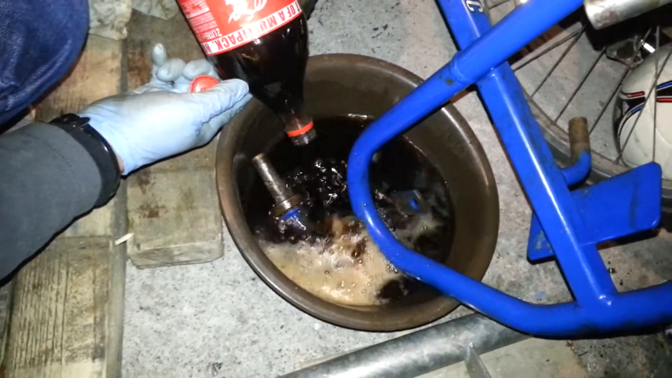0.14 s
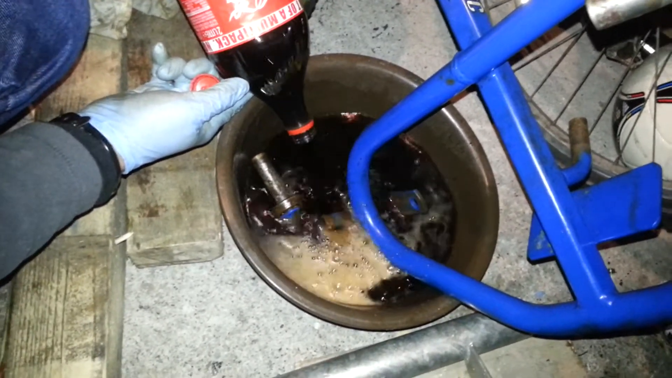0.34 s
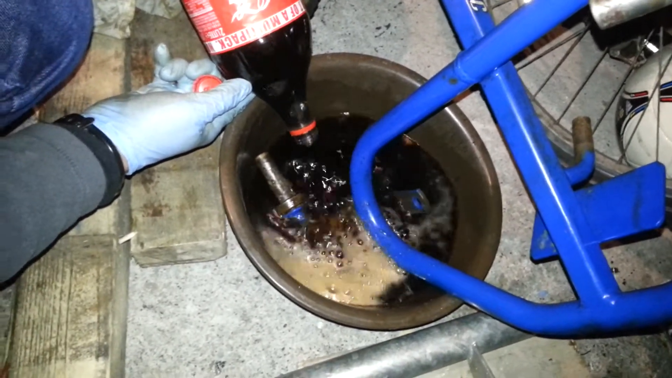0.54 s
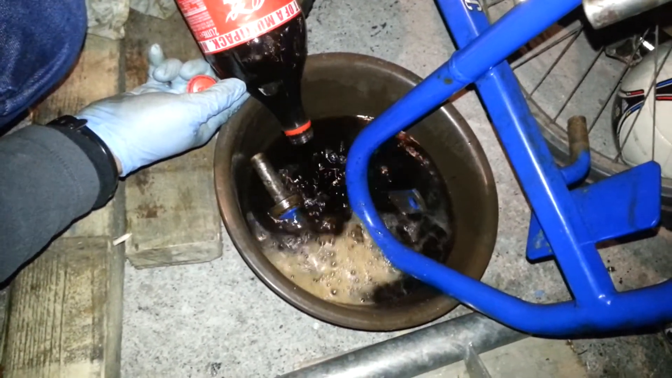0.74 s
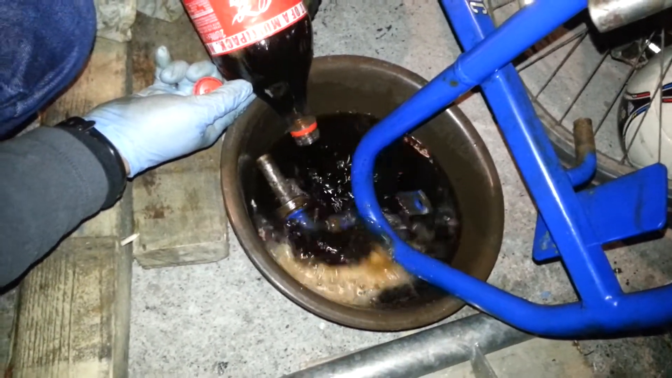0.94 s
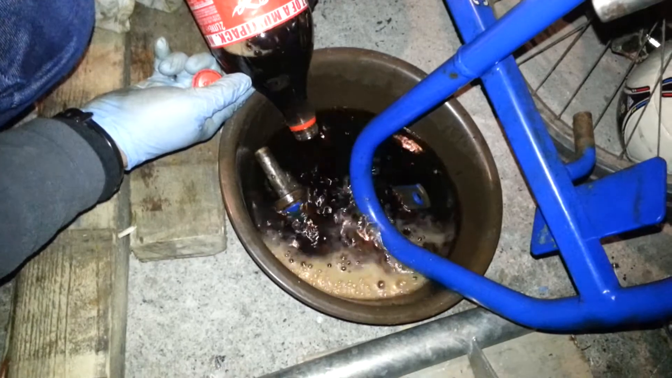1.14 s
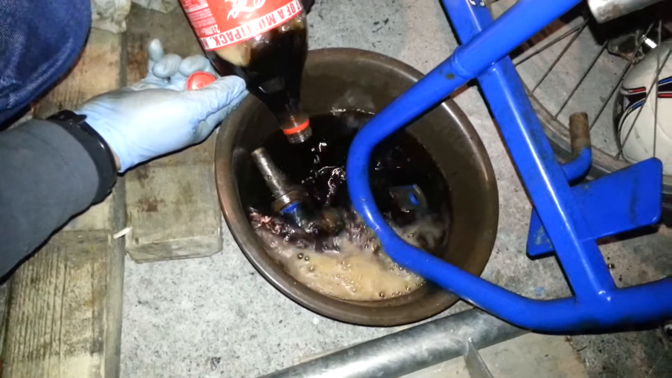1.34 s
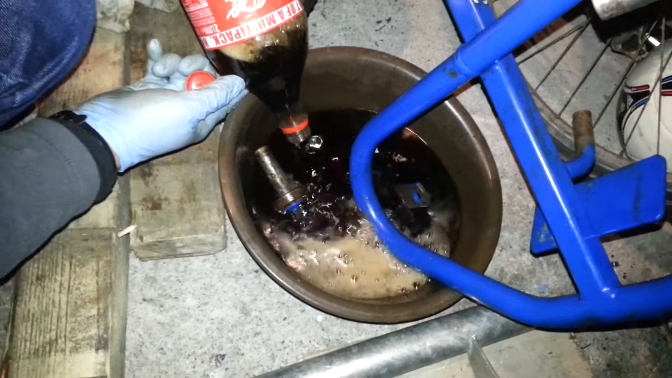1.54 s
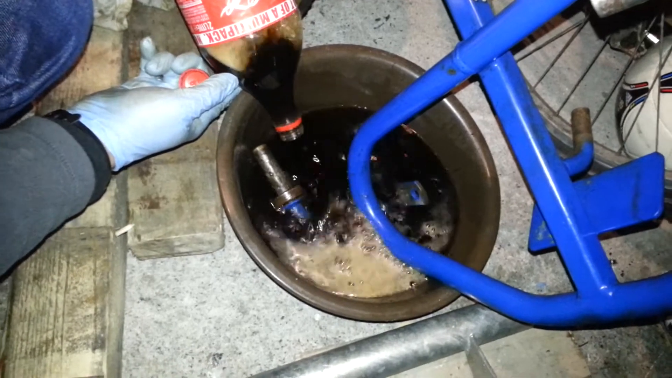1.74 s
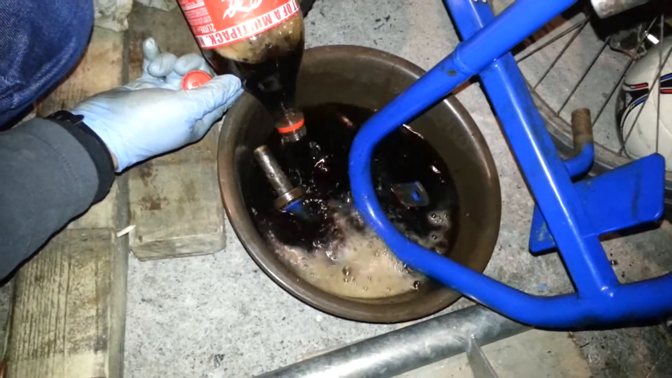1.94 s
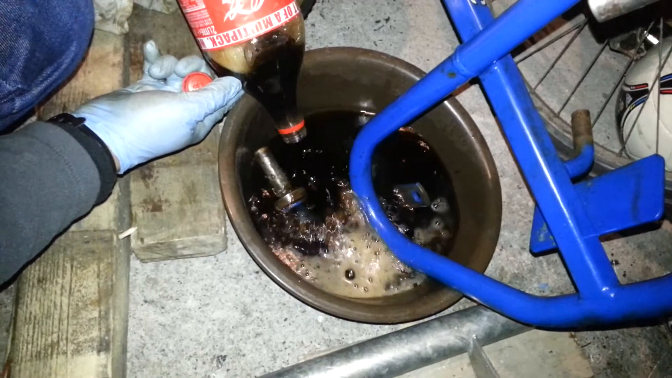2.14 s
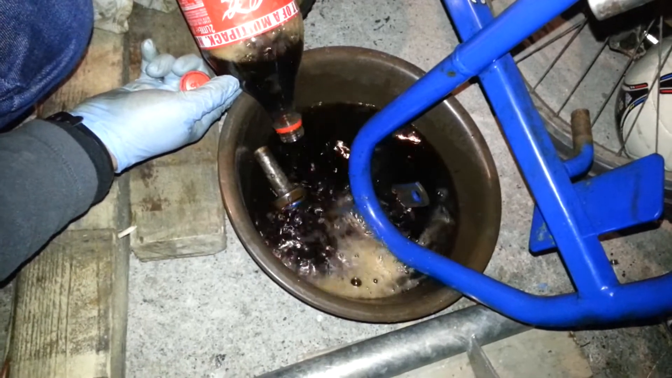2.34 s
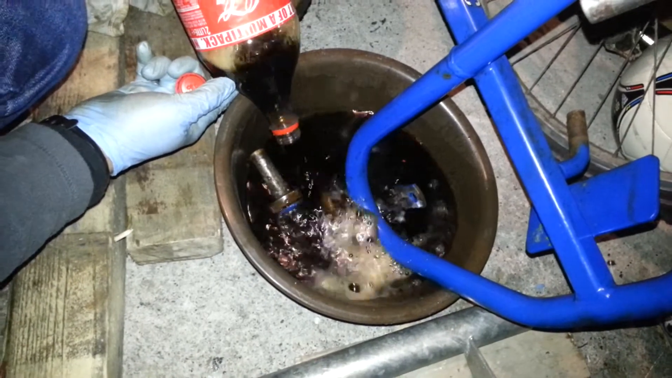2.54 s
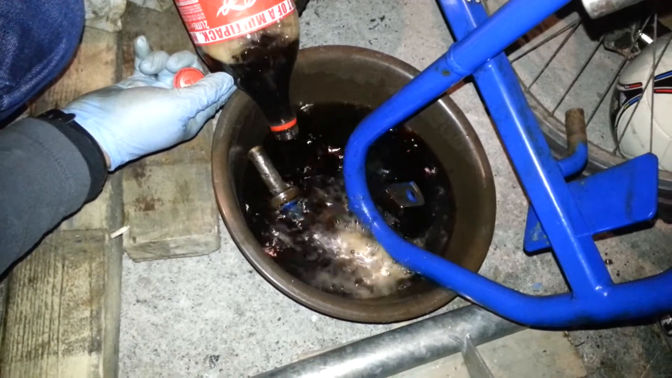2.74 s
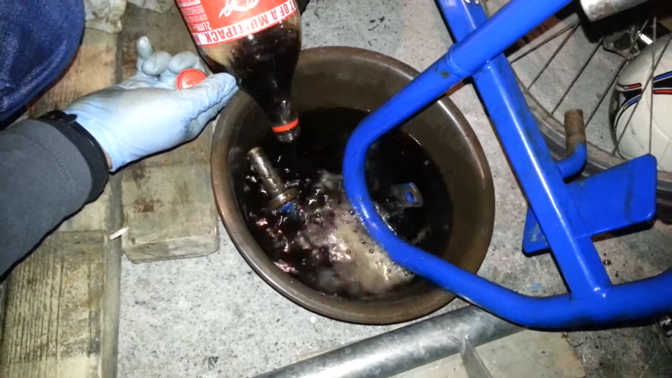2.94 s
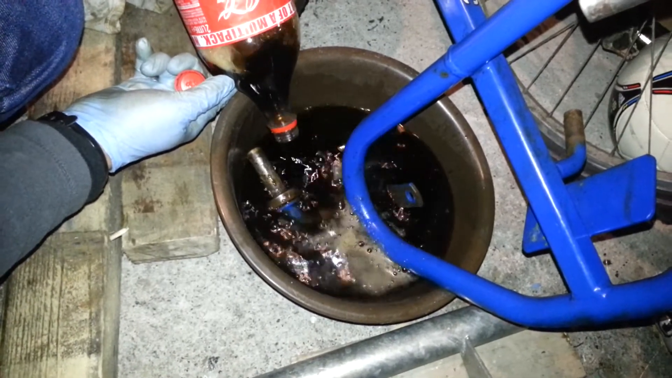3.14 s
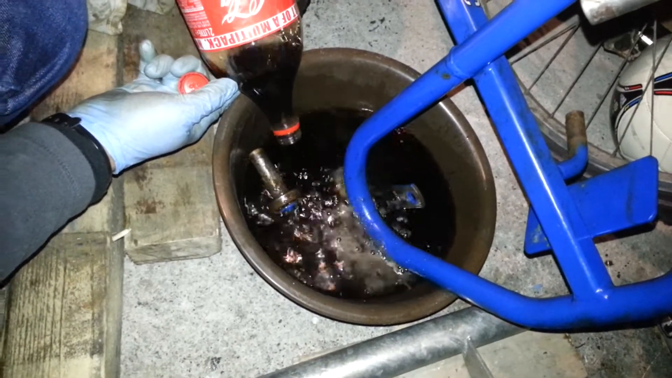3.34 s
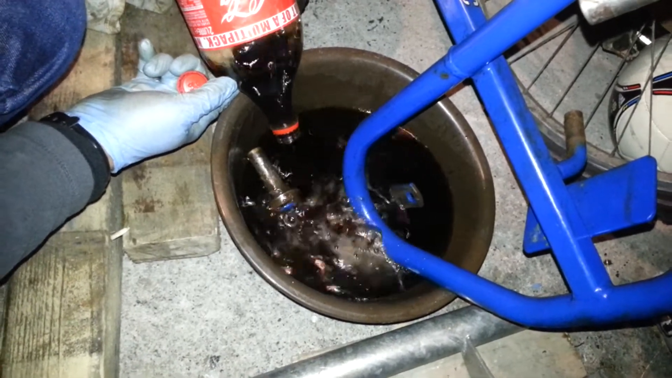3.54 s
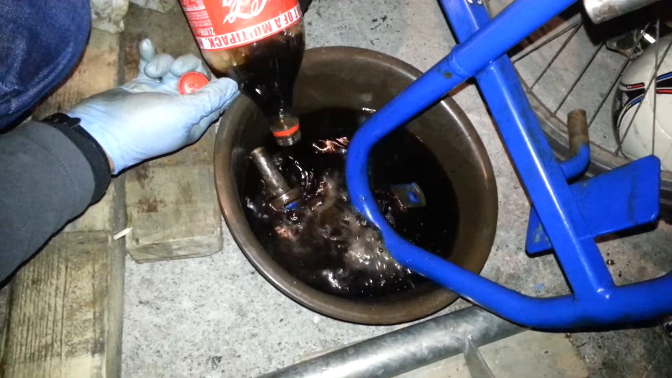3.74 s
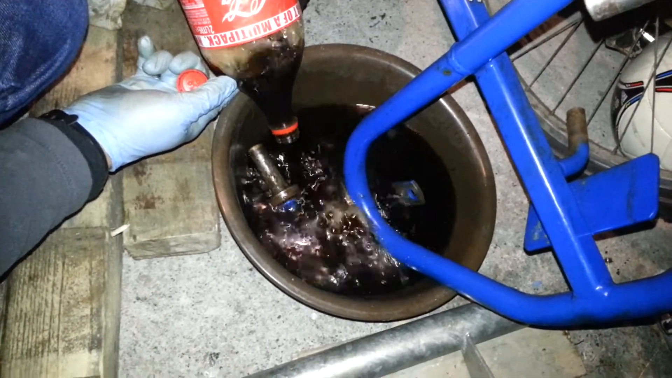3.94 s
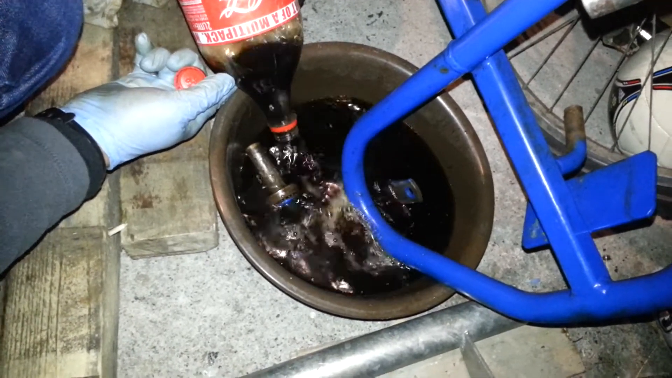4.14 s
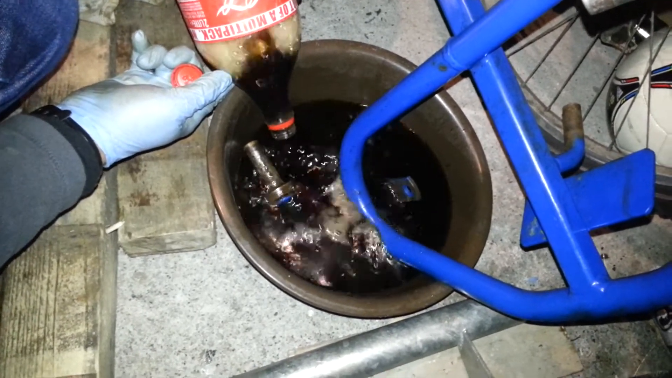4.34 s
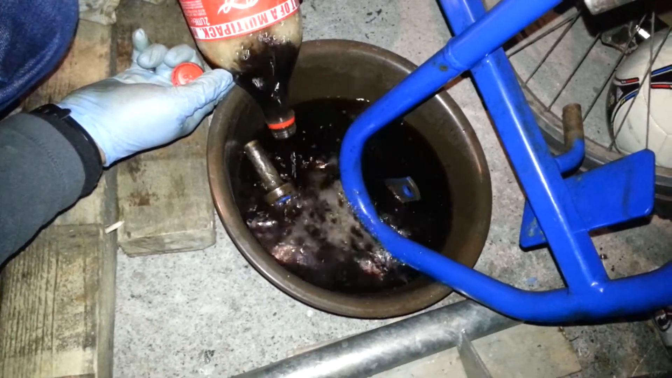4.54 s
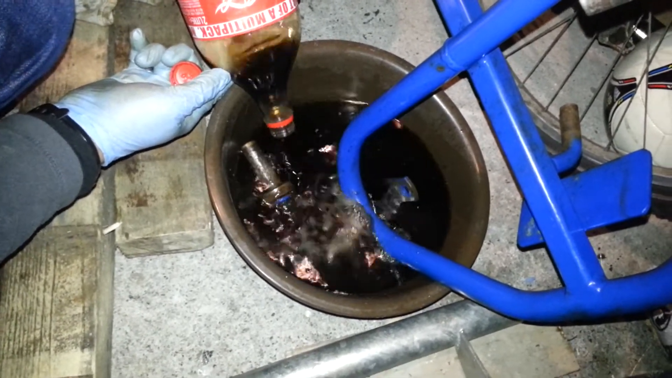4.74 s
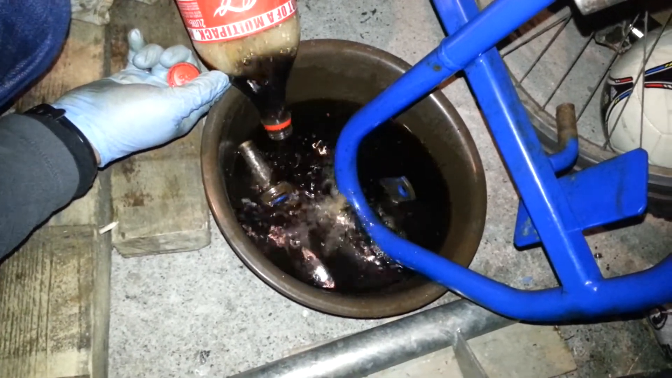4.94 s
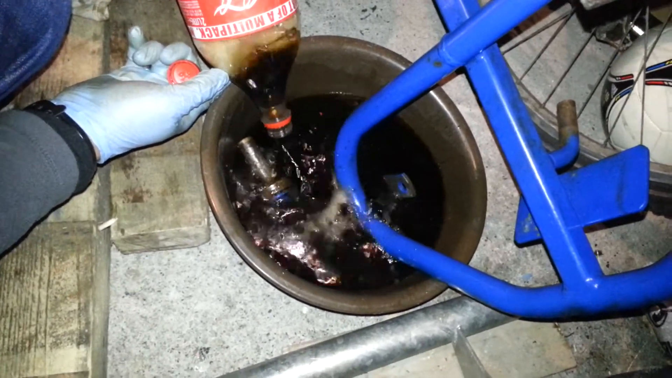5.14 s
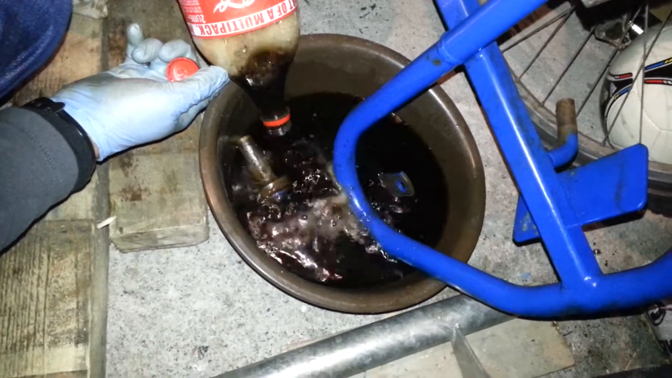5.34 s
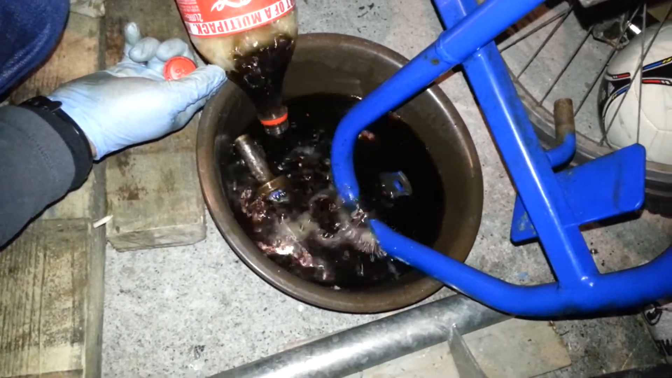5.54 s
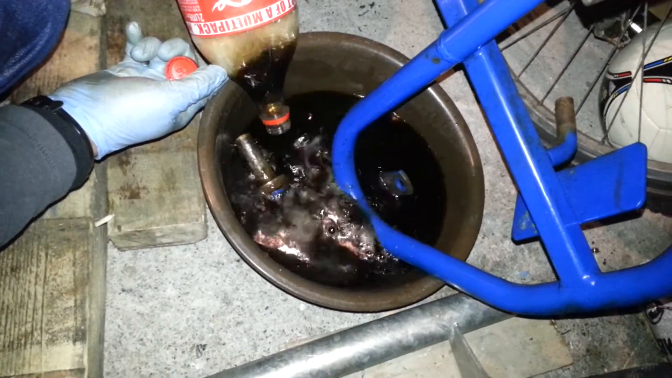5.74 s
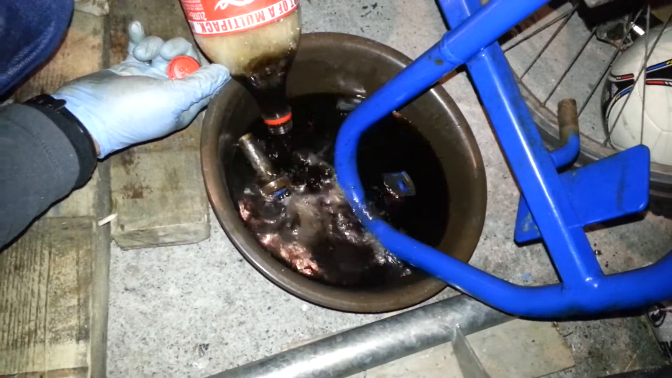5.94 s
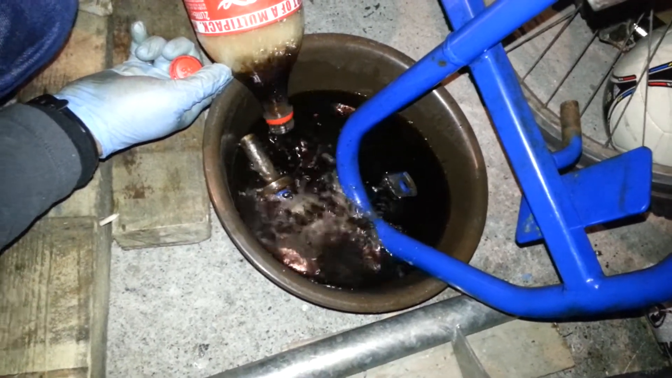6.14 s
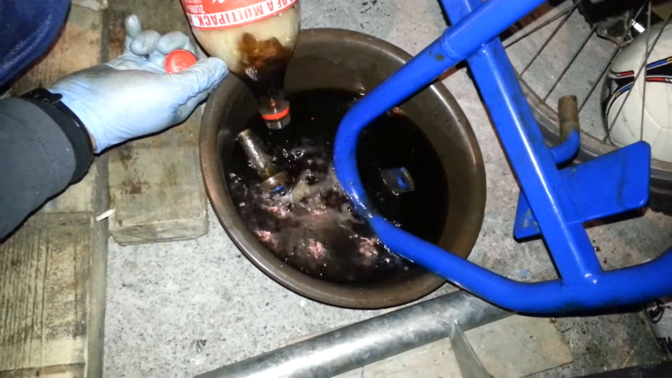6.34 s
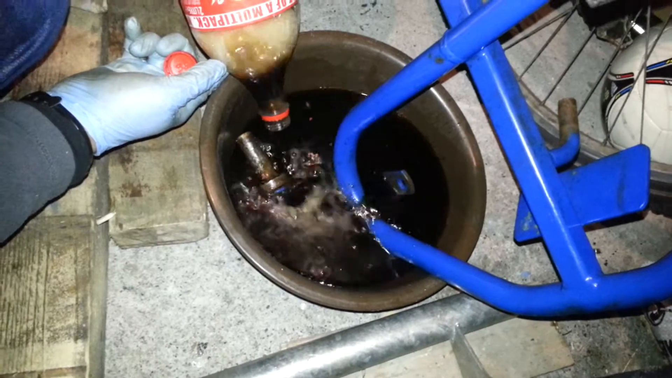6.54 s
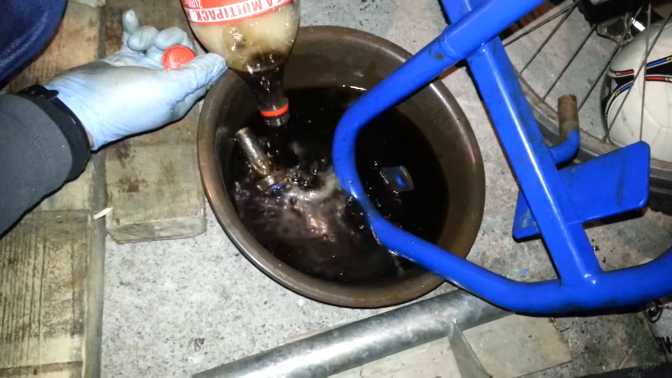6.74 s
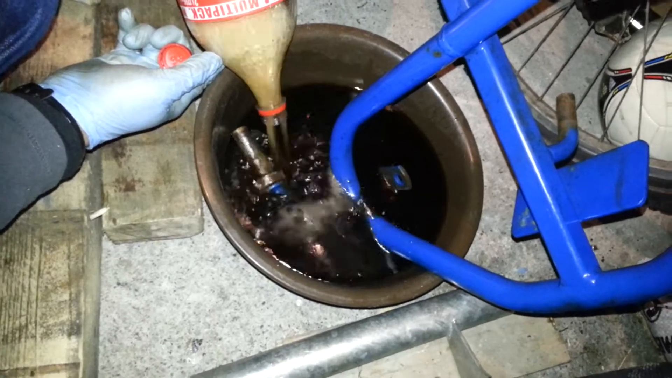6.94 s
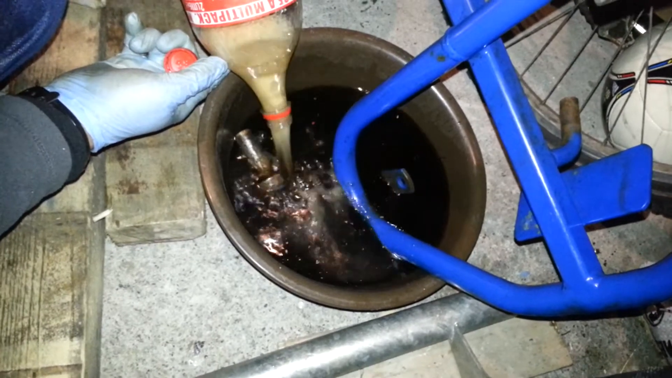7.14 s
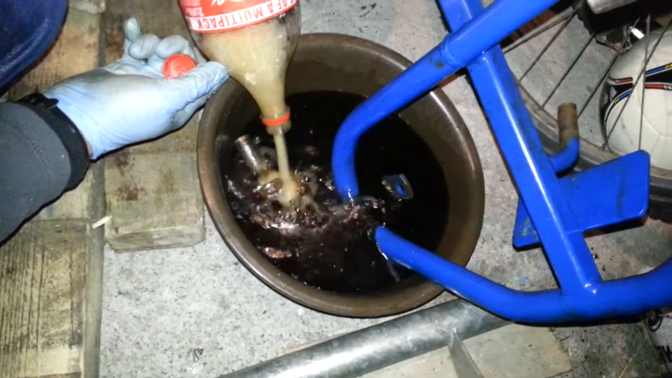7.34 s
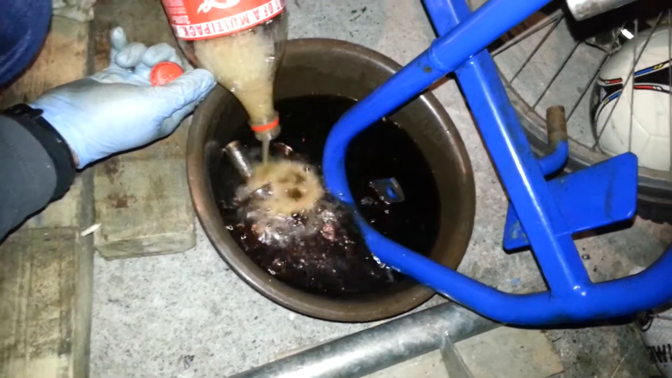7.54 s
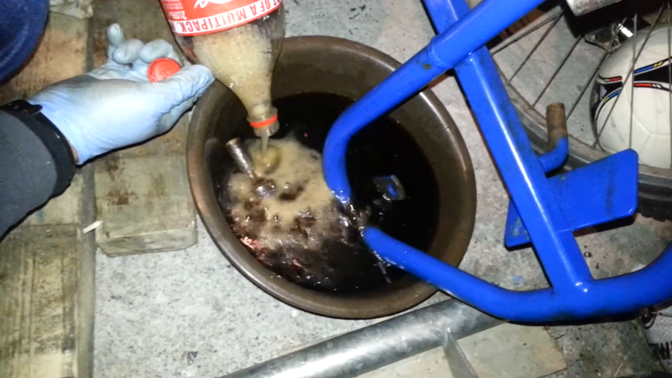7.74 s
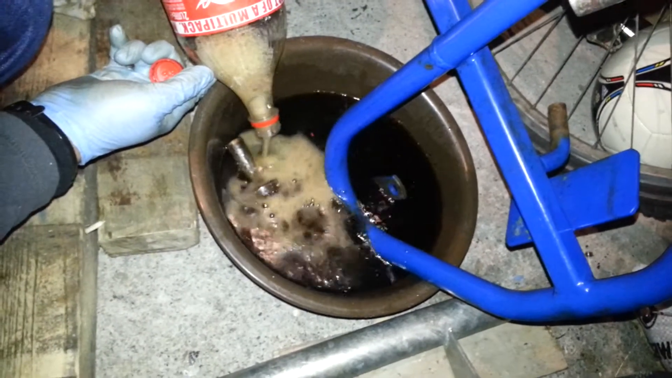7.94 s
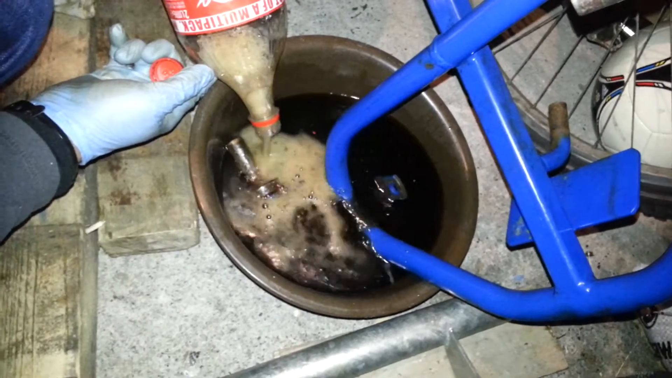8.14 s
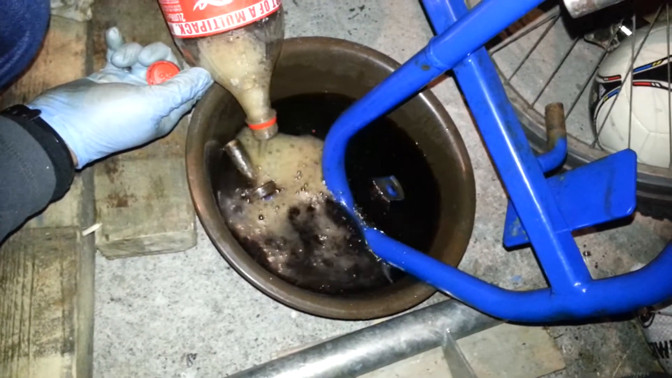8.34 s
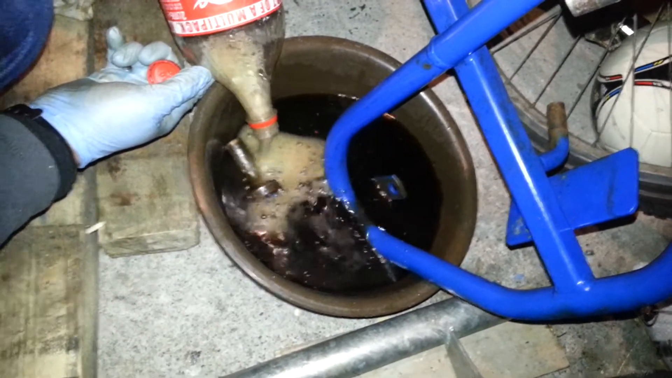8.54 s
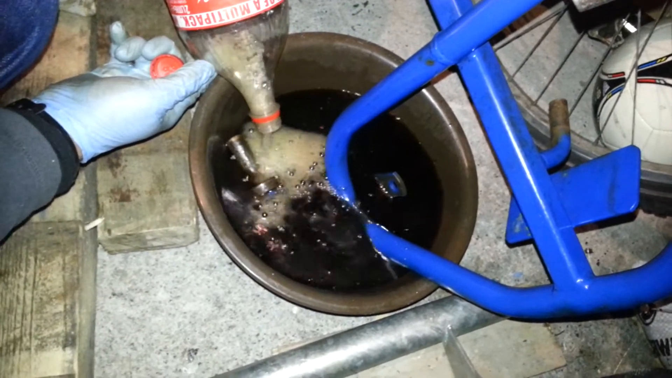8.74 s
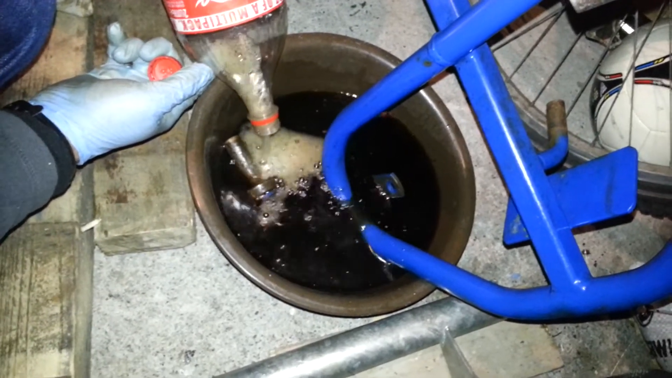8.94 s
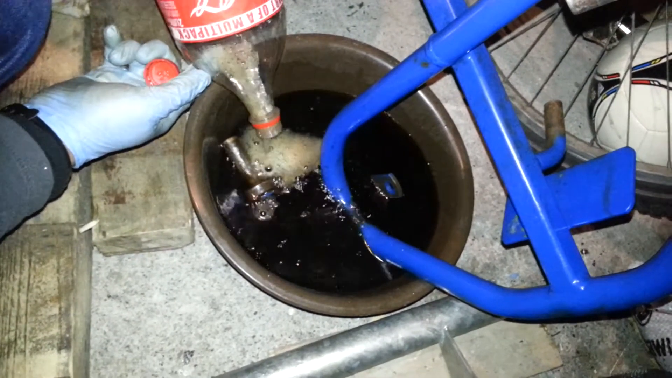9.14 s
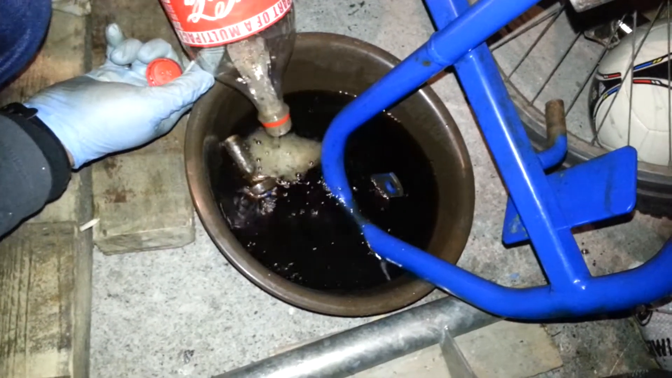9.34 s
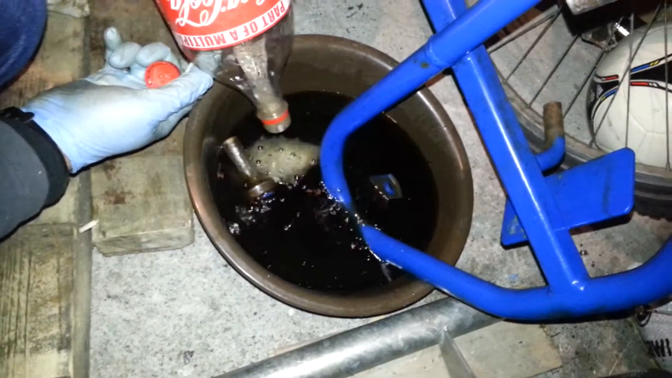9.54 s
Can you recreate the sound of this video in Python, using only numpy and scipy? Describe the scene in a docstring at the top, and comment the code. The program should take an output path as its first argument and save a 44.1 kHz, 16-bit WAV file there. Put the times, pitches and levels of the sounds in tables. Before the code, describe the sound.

Heard close up outdoors, soda glugs out of a plastic bottle and splashes into a bucket in irregular, round plops, each followed by a wet slosh and crisp little bubble bursts. A fine fizz runs underneath throughout. After one final gush the pouring ends, leaving only the soft hiss of foam, while something hollow nearby rumbles faintly and takes a few soft, low knocks.

```python
"""Fizzy drink glugs out of an upturned plastic bottle into a bucket of metal parts, a stereo mic close by.
Air gulps through the neck; each slug of liquid plops, sloshes and throws up droplets and bursting
bubbles, and the bucket and ground return the splash. The foam hisses on after the pouring ends.
Underneath, from somewhere nearby, come a low hollow rumble and a few dull knocks."""
import sys
import numpy as np
from scipy import signal
from scipy.fft import rfft, irfft, next_fast_len
from scipy.io import wavfile
from scipy.ndimage import uniform_filter1d

SR = 44100
rng = np.random.default_rng(int(sys.argv[2]) if len(sys.argv) > 2 else 0)


def bounce(signal):
    """Save signal as a 16-bit WAV file at the path given by the first command-line argument."""
    frames = np.transpose(np.atleast_2d(signal))
    limited = np.clip(frames, -1, 1)
    pcm = np.round(limited * 32767).astype(np.int16)
    wavfile.write(sys.argv[1], SR, pcm)


N = 422919

# small bubbles of the stream, thinning until a last gush: (time [s], level [dB])
STREAM_LEVEL = [(0.0, -41), (1.6, -40.5), (2.6, -41), (6.0, -50.5), (6.8, -55.5), (6.95, -40),
                (7.27, -46.5), (7.4, -81)]
# their tone: (frequency [Hz], gain [dB])
STREAM_COLOUR = [(350, -21), (600, 3.5), (1200, 4.5), (2500, 14), (4000, 16), (7000, 6), (13000, 24.5)]
# foam hiss: (time [s], level [dB])
FOAM_LEVEL = [(0.0, -43.5), (2.2, -42.5), (2.9, -41.5), (3.47, -44), (5.72, -45.5), (7.0, -45.5),
              (7.4, -47), (8.6, -43.5), (9.25, -47), (9.59, -48)]
# tone of the hiss, plus a treble cut above 14.4 kHz that is not the foam's: (frequency [Hz], gain [dB])
HISS_EQ = [(250, -11.5), (600, -7.5), (1000, -9.5), (1650, -12), (2150, -7.5), (2950, -10), (3650, -6),
           (3830, 0.5), (4000, -3), (5000, -3.5), (7000, -10.5), (9000, -11.5), (13000, -13),
           (14400, -10.5), (14750, -43)]
# likeness of the hiss left and right: (frequency [Hz], correlation [-1..1])
FOAM_LIKENESS = [(240, 0.16), (2000, 0.25), (15000, -0.17)]
# large air pockets closing: (time [s], level [dB], pitch [Hz], slosh against the plop [dB])
PLOPS = [(0.005, -23, 530, -6), (0.054, -23, 1030, -13), (0.173, -28, 650, -6), (0.191, -21, 760, -13),
         (0.235, -22, 684, -19), (0.248, -23.5, 700, -9.5), (0.283, -30, 550, -14), (0.436, -39.5, 643, 10),
         (0.459, -26, 850, -22), (0.539, -17.5, 750, -14), (0.582, -25, 560, -19),
         (0.605, -22.5, 720, -14.5), (0.779, -18.5, 622, -14.5), (0.843, -33, 645, -6),
         (0.958, -22, 846, -8.5), (1.07, -28.5, 653, -33), (1.163, -31, 1010, -9), (1.231, -21.5, 770, -9),
         (1.259, -34, 845, -41), (1.378, -34.5, 1160, 2.5), (1.415, -18, 826, -13), (1.516, -27, 594, -16),
         (2.011, -28.5, 1060, -8), (2.059, -26.5, 670, -9), (2.14, -24, 1256, -35), (2.29, -32, 546, -2),
         (2.613, -24, 736, -14), (2.675, -14, 583, -15), (2.706, -16, 550, -26), (2.866, -17, 795, -10),
         (2.996, -26, 560, -10), (3.161, -29.5, 734, 1.5), (3.242, -26, 606, -24), (3.255, -18, 676, -13),
         (3.407, -16, 707, -15), (3.68, -19, 616, -12), (3.731, -22.5, 970, -14), (3.811, -22.5, 585, -9),
         (3.827, -23, 1060, -18), (3.93, -16, 1430, -11), (4.181, -24.5, 650, -3.5), (4.195, -23, 584, -39),
         (4.222, -27.5, 483, -37), (4.538, -6, 536, -37), (4.702, -15.5, 672, -15.5),
         (4.842, -24, 606, -35), (4.867, -25, 656, -12), (5.039, -27, 1000, -12), (5.188, -27.5, 640, -1.5),
         (5.252, -20, 940, -19), (5.266, -19.5, 666, -14.5), (5.613, -31.5, 525, -35),
         (5.702, -24, 550, -9), (5.77, -32, 650, -9), (5.864, -22, 583, -8), (5.893, -21.5, 610, -33),
         (5.904, -16, 560, -15), (5.924, -16, 548, -14.5), (6.05, -20.5, 685, -13),
         (6.101, -25.5, 1070, -15.5), (6.23, -12.5, 617, -20), (6.286, -31, 1530, -15),
         (6.382, -23, 596, -15), (6.689, -22, 690, -20), (6.706, -17, 535, -21), (6.845, -25, 660, -9.5),
         (6.932, -19, 590, -16), (6.966, -28.5, 1160, -9.5), (7.013, -36, 815, -2), (7.098, -36, 830, -6.5),
         (7.13, -33.5, 614, -15)]
# tone of the slosh: (frequency [Hz], gain [dB])
SLOSH_COLOUR = [(430, 3), (700, 5.5), (1100, 6), (2000, 10), (3000, 5.5), (4000, 15), (7000, 12.5)]
# air modes of the bucket: (frequency [Hz], gain [dB], time to fall 60 dB [s])
BUCKET_MODES = [(468.3, -4.5, 0.1), (574.8, -14.5, 0.19), (653, -8, 0.064), (820, -7.5, 0.1)]
# gulps at the bottle neck: (time [s], level [dB], pitch [Hz])
GLUGS = [(0.01, -35.5, 256), (0.588, -36, 305), (1.032, -29.5, 306), (1.472, -27.5, 306),
         (1.655, -35.5, 296), (1.9, -27, 320), (2.293, -28, 303), (2.43, -31.5, 288), (2.659, -26.5, 305),
         (2.997, -35.5, 295), (3.257, -32, 266), (3.813, -33, 330), (4.182, -32.5, 285),
         (5.302, -28.5, 293), (5.89, -33, 282)]
# small bubbles bursting: (time [s], level [dB], pitch [Hz])
POPS = [(0.012, -20, 3820), (0.285, -23.5, 3680), (0.337, -21, 2570), (0.402, -31, 2070), (0.49, -27, 4000),
        (0.512, -21, 1800), (0.537, -21, 1820), (0.581, -19, 4250), (0.6, -21, 2800), (0.892, -27, 2390),
        (0.942, -21, 3740), (0.974, -19, 4400), (0.993, -24, 3780), (1.067, -17.5, 3880),
        (1.222, -17.5, 1940), (1.359, -23, 3930), (1.3803, -19.5, 1900), (1.405, -17, 4100),
        (1.428, -15, 4150), (1.767, -33, 2270), (1.866, -27.5, 2290), (1.928, -10, 2990),
        (2.0616, -19.5, 4120), (2.218, -23, 1930), (2.269, -9.5, 3960), (2.615, -22.5, 2480),
        (2.6397, -27, 3520), (2.66, -8.5, 3180), (2.681, -16, 3400), (2.688, -15, 2650),
        (2.757, -22.5, 2100), (2.836, -21.5, 2370), (2.865, -11.5, 3980), (2.9168, -22.5, 1970),
        (3.1542, -19, 4000), (3.2313, -26, 2420), (3.256, -15.5, 1800), (3.396, -27.5, 2140),
        (3.733, -26, 1580), (3.782, -25.5, 3000), (3.8117, -12.5, 2900), (3.929, -9.5, 3370),
        (3.986, -21, 3900), (4.1802, -22.5, 1870), (4.184, -15.5, 3500), (4.2597, -21, 2150),
        (4.337, -24.5, 4760), (4.475, -29.5, 1530), (4.5403, -23, 2900), (4.5954, -21.5, 4100),
        (4.69, -20, 3970), (4.805, -23.5, 5000), (4.84, -26.5, 2520), (4.8703, -22, 1570),
        (5.1881, -26.5, 2100), (5.228, -28, 2000), (5.244, -27, 2000), (5.2668, -22, 3600),
        (5.365, -30, 3270), (5.691, -26, 1990), (5.894, -17, 4480), (5.924, -13.5, 2640),
        (6.009, -21.5, 2220), (6.155, -30.5, 1840), (6.211, -27, 1800), (6.231, -18.5, 3680),
        (6.568, -23, 3940), (6.706, -23.5, 3620), (7.182, -34, 2540)]
# flying droplets: (time [s], level [dB])
DROPLETS = [(1.072, -17), (1.379, -28), (1.425, -30), (1.6584, -28.5), (1.699, -22), (2.092, -24.5),
            (2.2503, -33), (2.6805, -25), (2.874, -22), (3.158, -34), (3.4067, -28), (4.2707, -21),
            (4.536, -30), (4.598, -26.5), (5.076, -27), (5.252, -27), (5.894, -24), (6.157, -18),
            (6.8455, -25)]
# rumbling: (time at full strength [s], hold [s], level [dB], upper modes against lowest [dB])
RUMBLE_BOUTS = [(1.17, .03, -64, -22), (1.4, 0.013, -45, 2.5), (2.17, 0.16, -60, -6),
                (2.54, 0.1, -46.5, 2.5), (2.72, 0.24, -53, 0), (4.1, 0.36, -67, 2), (5.12, .45, -65.5, 7),
                (5.88, 0.086, -58, -6), (7.4, 0.13, -60, -9), (7.7, 0.088, -58, -4.5),
                (8.1, 0.058, -51.5, -10), (8.47, 0.13, -53.5, -1.5), (8.83, 0.023, -51, 2.5),
                (8.95, 0.12, -56, -24), (9.49, .1, -60, 3)]
# the hollow body nearby: (frequency [Hz], width [Hz], gain [dB])
HOLLOW_MODES = [(84.5, 25, -5), (98.7, 7, 0), (138, 25, 1), (217.7, 11.3, -4), (248.7, 11.3, 0),
                (356, 24, -4.5), (423.6, 15, -6), (542.4, 8.5, -1.5), (640, 88, -3)]
# blows on that body: (time [s], level [dB], upper modes against lowest [dB])
KNOCKS = [(2.53, -51, -28), (7.68, -61, 12), (8.455, -45.5, -5.5), (8.813, -50, -5), (9.491, -48, -12)]
# balance at the microphone: (frequency [Hz], left minus right [dB])
MIC_BALANCE = [(150, 0.5), (380, -1), (950, 2.5), (2380, 6), (5980, 2.5), (15000, 2.5)]

UPPER_MODES_HZ = 170  # the hollow body's upper modes lie above this


def gain_of(db):
    return 10 ** (np.asarray(db) / 20)


def unit_rms(x):
    return x / np.sqrt(np.mean(x ** 2) + 1e-20)


def at_frequency(points, hz):
    f, value = np.transpose(points)
    return np.interp(np.log(hz + 1), np.log(f + 1), value)


def envelope(rows):
    """Gain at every sample from a dB curve, silent after it."""
    s, db = np.transpose(rows)
    return gain_of(np.interp(np.arange(N) / SR, s, db, right=-200))


def wander(samples):
    """Slow random drift; rms 1."""
    return unit_rms(uniform_filter1d(rng.standard_normal(N), samples))


def add(mix, s, sound):
    part = mix[max(round(s * SR), 0):][:len(sound)]
    part += sound[:len(part)]


def resonate(x, hz, width):
    """A steep resonance: a narrow peak filter, then a wider one."""
    narrow = signal.lfilter(*signal.iirpeak(hz, hz / width, SR), x)
    return signal.lfilter(*signal.iirpeak(hz, hz / (3 * width), SR), narrow)


def bubble(hz, t60, rise_s, glide):
    """An air pocket rings up and dies away; a positive glide lifts its pitch as it nears the surface."""
    t = np.arange(0, 1.3 * t60 + 4 * rise_s, 1 / SR)
    shape = (1 - np.exp(-(t / rise_s) ** 2)) * gain_of(-60 * t / t60)
    return shape / shape.max() * np.sin(2 * np.pi * hz * (t + glide * t ** 2 / (2 * t60)))


def pinch(hz, length_s, sag):
    """A pocket pinched shut: a few cycles that swell, sag in pitch and stop."""
    u = np.arange(0, 1, 1 / SR / length_s)
    return np.sin(np.pi * u ** 0.5) ** 2 * np.sin(2 * np.pi * hz * length_s * (u + sag * u * (.8 - u)))


def swarm(pitches, colour, per_s, spread_db, clump_db, cycles):
    """Brief bubbles of chance size, pitch and moment, louder in clumps; rms 1."""
    clumps = unit_rms(uniform_filter1d(wander(300), 150))
    notes = [gain_of(at_frequency(colour, hz)) * bubble(hz, cycles / hz, 1 / hz, .37) for hz in pitches]
    out = np.zeros(N)
    for when, kind, rarity in rng.random((int(per_s * N / SR), 3)):
        size_db = spread_db * min(-np.log(1 - rarity), 4) + clump_db * clumps[int(when * N)]
        add(out, when * N / SR, gain_of(size_db) * notes[int(kind * len(notes))])
    return unit_rms(out)


def churn():
    """The stream's lesser bubbles, and a dense slosh after every plop, whose treble dies first."""
    stream = swarm(np.geomspace(400, 12000, 90), STREAM_COLOUR,
                   per_s=1500, spread_db=2.2, clump_db=3.2, cycles=18)
    slosh = swarm(np.geomspace(430, 7000, 70), SLOSH_COLOUR,
                  per_s=3000, spread_db=1.6, clump_db=2.6, cycles=14)
    slosh_low = signal.filtfilt(*signal.butter(2, 1040, fs=SR), slosh)
    out, t = gain_of(-2.5) * envelope(STREAM_LEVEL) * stream, np.arange(10000) / SR
    for band, t60 in ((slosh_low, .25), (slosh - slosh_low, .18)):
        swells = np.zeros(N)
        for s, db, _, slosh_db in PLOPS:
            add(swells, s, gain_of(db + slosh_db - 60 * t / t60) * (1 - np.exp(-t / .00081)))
        out += swells * band
    return signal.sosfilt(signal.butter(10, 14300, fs=SR, output="sos"), out)


def foam():
    """Countless tiny bursts merge to a patchy, seething hiss, partly unlike on the mic's two sides."""
    frames, hz = N // 128 + 5, np.fft.rfftfreq(512, 1 / SR)
    re, im, other_re, other_im, patches, surges = rng.standard_normal((frames, 257, 6)).T
    patches = unit_rms(uniform_filter1d(uniform_filter1d(patches, 8, axis=0), 10, axis=1))
    surges = unit_rms(uniform_filter1d(uniform_filter1d(surges, 24, axis=0), 36, axis=1))
    crackle = rng.exponential(1, frames) * np.clip(hz / 4000, 0, 1)[:, None]  # nearer bursts stand out
    likeness = at_frequency(FOAM_LIKENESS, hz)[:, None]
    left = re + 1j * im
    right = likeness * left + np.sqrt(1 - likeness ** 2) * (other_re + 1j * other_im)
    colour = gain_of(at_frequency(HISS_EQ, hz)[:, None] + 1.1 * patches + .6 * surges + .3 * crackle)
    _, hiss = signal.istft(colour * np.array([left, right]), nperseg=512, noverlap=384)
    return gain_of(4.5) * envelope(FOAM_LEVEL) * unit_rms(hiss[:, :N])


def plops():
    """A slug of liquid slaps the surface and shuts an air pocket; the bucket's air rings faintly."""
    out, t = np.zeros(N), np.arange(SR // 4) / SR
    for s, db, hz, _ in PLOPS:
        add(out, s, gain_of(db - 8) * pinch(3 * hz, .6 / hz, sag=.4))  # the slap
        add(out, s, gain_of(db) * pinch(hz, 5.25 / hz, sag=.27))
        sinking_pocket = bubble(1.05 * hz, t60=22 / hz, rise_s=.002, glide=-.25)
        add(out, s + 3 / hz, gain_of(db - 14) * sinking_pocket)
    bucket = sum(gain_of(db - 40.5 - 60 * t / t60) * np.sin(2 * np.pi * hz * t)
                 for hz, db, t60 in BUCKET_MODES)
    out += signal.oaconvolve(out, bucket)[:N]
    return signal.lfilter(*signal.butter(2, 200, "high", fs=SR), out)  # too small for deep bass


def glugs():
    """Air gulped through the bottle neck sounds low, round notes."""
    out = np.zeros(N)
    for s, db, hz in GLUGS:
        add(out, s, gain_of(db) * bubble(hz, t60=.1, rise_s=.002, glide=.05))
        add(out, s, gain_of(db + 3) * pinch(1.73 * hz, 1 / hz, sag=.7))  # the neck smacks open
    return out


def pops():
    """A small bubble bursts: a short high note and faint ring inside a ragged snap of droplets."""
    out, t = np.zeros(N), np.arange(500) / SR
    swell = (1 - np.exp(-(t / .00029) ** 2)) * np.exp(-t / .0017)
    noise = rng.standard_normal((len(POPS), len(t)))
    snaps = signal.lfilter(*signal.butter(2, [1100, 7000], "band", fs=SR), noise)
    for (s, db, hz), snap in zip(POPS, snaps):
        add(out, s, gain_of(db + .5) * pinch(hz, .0028, sag=.25))
        add(out, s, gain_of(db - 17) * bubble(hz, t60=55 / hz, rise_s=.002, glide=.1))
        add(out, s, gain_of(db - 1) * swell * snap)
    return out


def echoes(splash, sets=6, turn_s=.037):
    """Short, bright echoes off bucket and ground; sets crossfade steadily so no fixed pitch rings."""
    taps, t = np.zeros((sets, 2, 3000)), np.arange(3000) / SR
    delays = np.arange(20, 2980, 20) + rng.integers(0, 20, (sets, 2, 148))
    np.put_along_axis(taps, delays, rng.choice([-1., 1.], delays.shape), 2)
    taps *= gain_of(-60 * t / .012) + gain_of(-22 - 60 * t / .08)  # near walls first, then the yard
    taps /= np.linalg.norm(taps[0, 0])
    bright = signal.lfilter(*signal.butter(2, 900, "high", fs=SR), splash)
    turn = (np.arange(N) / SR / turn_s - np.arange(sets)[:, None]) % sets
    crossfade = np.sin(np.pi / 2 * np.minimum(turn, 2))  # equal power
    return signal.oaconvolve((crossfade * bright)[:, None], taps, axes=2).sum(0)[:, :N]


def spray():
    """Flying droplets tick, each a puff of treble noise a few milliseconds long."""
    out, swell = np.zeros(N), signal.windows.hann(330) ** 2
    noise = rng.standard_normal((len(DROPLETS), len(swell)))
    puffs = signal.lfilter(*signal.butter(2, [5000, 13000], "band", fs=SR), noise)
    for (s, db), puff in zip(DROPLETS, puffs):
        add(out, s - .003, gain_of(db) * swell * puff)
    return out


def rumble(rise_db_per_s=450, fall_db_per_s=103):
    """Lumpy noise shakes a hollow body nearby, in bouts that rise fast, hold and sink to a faint floor."""
    shake = gain_of(1.8 * wander(1500)) * rng.standard_normal((2, N))
    t, coarse_t = np.arange(N) / SR, np.arange(0, N + 256, 256) / SR
    s, hold, bout_db, upper_db = np.transpose(RUMBLE_BOUTS)[:, :, None]
    before, after = np.maximum(s - coarse_t, 0), np.maximum(coarse_t - s - hold, 0)
    bouts = gain_of(bout_db - rise_db_per_s * before - fall_db_per_s * after)
    lowest = np.interp(t, coarse_t, bouts.sum(0)) + gain_of(-76)
    upper = np.interp(t, coarse_t, (bouts * gain_of(upper_db)).sum(0)) + gain_of(-63)
    mid, side = sum(gain_of(db) * (upper if hz > UPPER_MODES_HZ else lowest)
                    * unit_rms(resonate(shake, hz, width)) for hz, width, db in HOLLOW_MODES)
    return mid + .17 * side * np.array([[1], [-1]])


def knocks():
    """A soft blow sets all the modes of the same hollow body ringing at once."""
    out, t = np.zeros(N), np.arange(SR // 2) / SR
    for s, blow_db, upper_db in KNOCKS:
        ring = np.zeros(len(t))
        for hz, width, db in HOLLOW_MODES:
            decay = gain_of(db + upper_db * (hz > UPPER_MODES_HZ)) * np.exp(-np.pi * .5 * width * t)
            ring += decay * np.sin(2 * np.pi * (hz * t + rng.random()))
        add(out, s, gain_of(blow_db) * (1 - np.exp(-t / .0023)) * ring)
    return out


def scene():
    """Close up, the pour, its echoes and the foam; farther off, the hollow body."""
    liquid = glugs() + plops() + pops() + spray() + churn()
    return liquid + gain_of(.4) * echoes(liquid) + foam() + rumble() + knocks()


def record(dry, left_lag_s=6e-5, bass_cut_hz=72, top_hz=15800):
    """Close stereo microphone: the left side is brighter and a little late; both band ends are cut."""
    size = next_fast_len(N + 2048)
    hz = np.fft.rfftfreq(size, 1 / SR)
    tilt = gain_of(at_frequency(MIC_BALANCE, hz) / 2)
    ports = np.array([tilt * np.exp(-2j * np.pi * hz * left_lag_s), 1 / tilt])
    heard = irfft(rfft(dry, size) * ports, size)[:, :N]
    heard = signal.sosfilt(signal.butter(3, bass_cut_hz, "high", fs=SR, output="sos"), heard)
    gusts = gain_of(-80 + 4 * wander(9000))  # faint air at each port
    heard += gusts * signal.lfilter([.1], [1, -.995], rng.standard_normal((2, N)))
    return signal.oaconvolve(heard, signal.firwin(511, top_hz, window=("kaiser", 9), fs=SR)[None], "same")


dry = scene()
out = record(dry)
bounce(out)
```